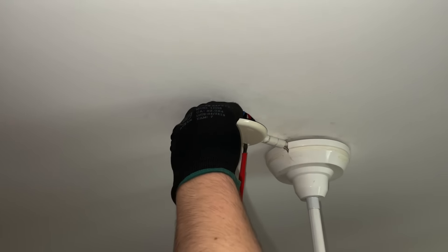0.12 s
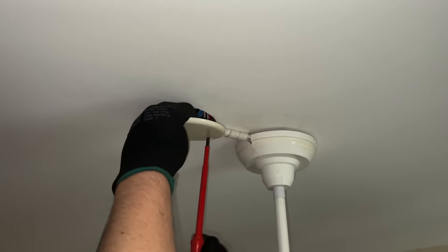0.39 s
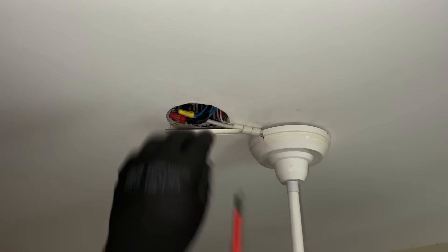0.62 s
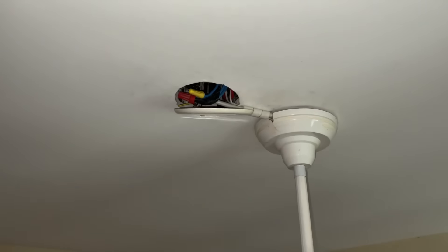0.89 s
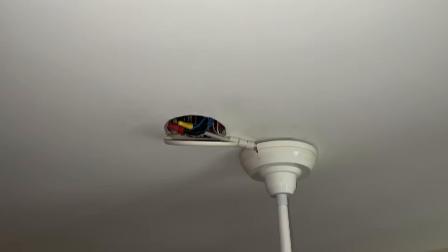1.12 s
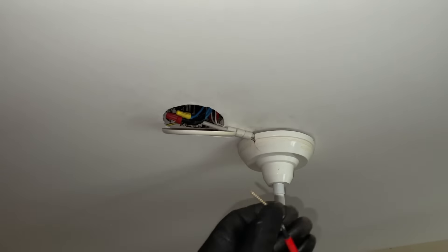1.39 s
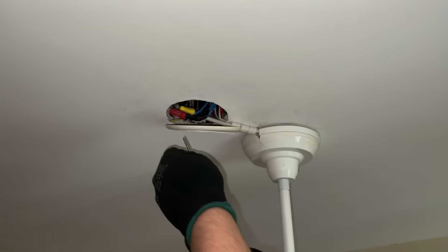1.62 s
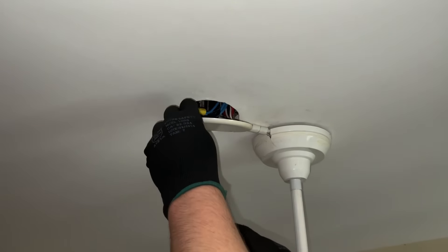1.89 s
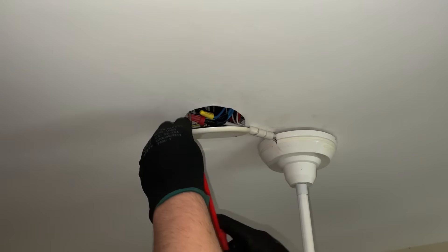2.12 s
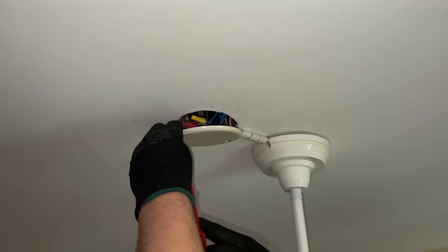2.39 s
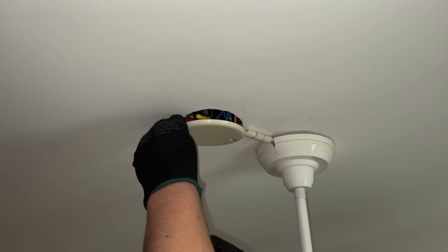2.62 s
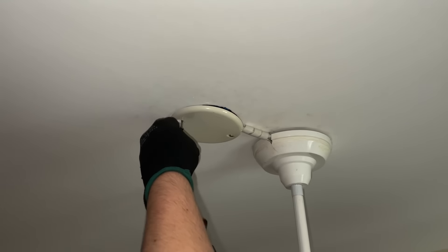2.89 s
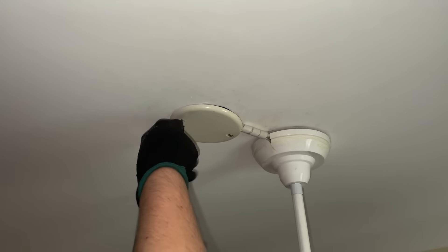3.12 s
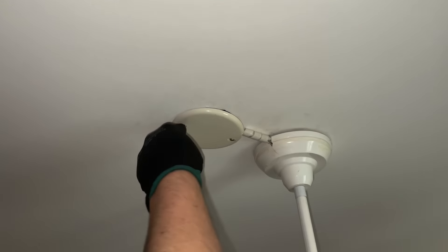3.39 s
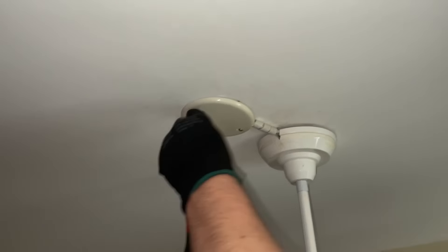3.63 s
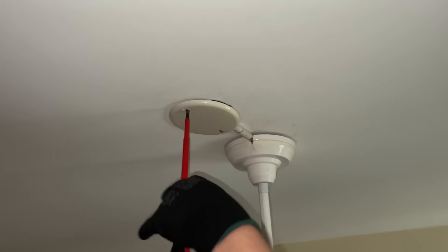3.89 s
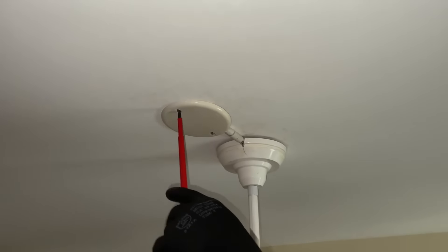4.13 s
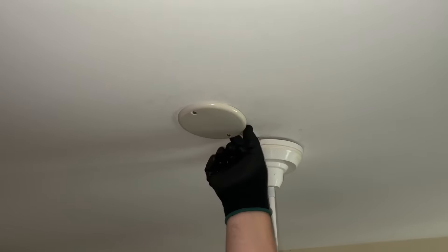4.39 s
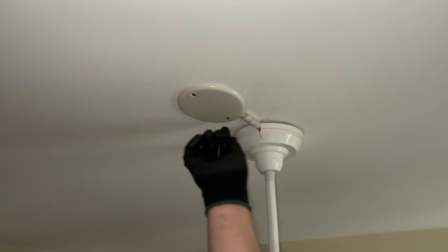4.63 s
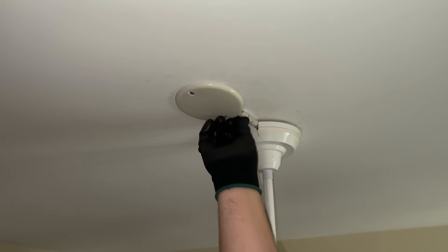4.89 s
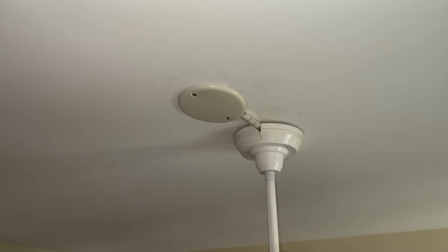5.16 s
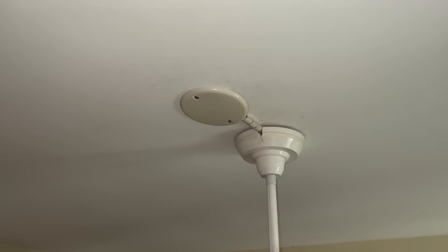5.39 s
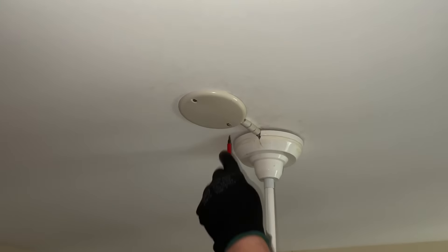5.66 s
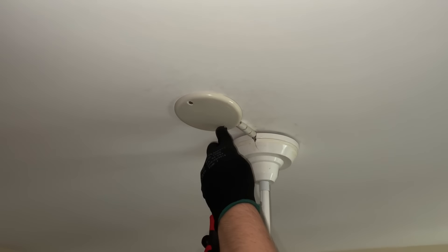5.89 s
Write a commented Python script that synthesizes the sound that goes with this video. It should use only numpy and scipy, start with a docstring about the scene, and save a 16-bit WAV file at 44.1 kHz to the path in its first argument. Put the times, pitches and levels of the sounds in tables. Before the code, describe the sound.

Sped-up fitting of a plastic ceiling cover: faint irregular knocks, rattles and glove scuffs, with one sharp loud clack near the middle.

```python
"""Fitting a cover to a ceiling box, in fast motion

Gloved hands and a screwdriver fit a plastic cover, heard from a phone below. Struck modes and noisy clatter
make its knocks and rattles, gritty coloured hisses the scuffs of glove and tool, low damped swings the thumps
of the phone's stand. The shaft of the screwdriver rings faintly. Between them, rumble, handling and rustle
flicker in short overlapping snatches with small ticks, over a steady faint hiss."""
import sys
import numpy as np
from scipy import signal
from scipy.fft import rfft, irfft
from scipy.io import wavfile
from scipy.ndimage import uniform_filter1d

SR = 44100
rng = np.random.default_rng(int(sys.argv[2]) if len(sys.argv) > 2 else 0)


def materialize(psi):
    """Save the field psi as 16-bit PCM at rate SR to the path in sys.argv[1].

    A 1-D psi becomes a single channel; in a 2-D psi each row is a channel.
    """
    bounded = np.clip(np.atleast_2d(psi).T, -1, 1)
    quanta = np.round(bounded * 32767).astype(np.int16)
    wavfile.write(sys.argv[1], SR, quanta)


def ratio(d):
    """dB to gain"""
    e = np.asarray(d, float) / 20
    return 10 ** e


N = 265614
T = np.arange(N) / SR

# Colour of loose clatter. Each row: frequency in Hz, relative level in dB.
CLATTER_COLOUR = [(300, 5), (1000, 0), (2500, -3.5), (4000, -12), (7000, -19), (12000, -31), (16000, -37)]
# Where the hands work. Each row: time in seconds, left minus right in dB.
HAND_PAN = [(0, -0.5), (1.5, 1), (2.2, 0.5), (2.8, -0.5), (3.4, 1.5), (3.87, 0), (3.94, 2), (4.6, -1),
            (5.3, -1), (6.02, 1)]


def on_hz(points, size):
    """Spreads a (Hz, value) table over the bins of a transform, along a log frequency axis."""
    hz, value = np.transpose(points)
    bins_hz = np.arange(size // 2 + 1) * SR / size
    return np.interp(np.log(bins_hz + 1), np.log(hz + 1), value)


def noise(colour, size=N, peaks_db=0):
    """Coloured stereo noise of rms 1, its sides differing by frequency; peaks_db adds chance resonances."""
    # Stereo difference. Each row: frequency in Hz, side signal as a share of mid.
    side_share = [(30, .08), (100, .12), (300, .3), (1000, .5), (2000, .6), (6000, .6), (7700, .06),
                  (8900, .06), (10000, .15), (16000, .1)]
    mid, side = rfft(rng.standard_normal((2, size)))
    octaves = np.arange(5.5, 15, .2)
    peaks = on_hz(np.c_[2 ** octaves, rng.standard_normal(len(octaves))], size)
    tone = ratio(on_hz(colour, size) + peaks_db * peaks)
    difference = on_hz(side_share, size) * side * np.array([[1], [-1]])
    x = irfft(tone * (mid + difference), size)
    return x / x.std()


def ring(x, hz, t60):
    """Excites a damped mode, one complex pole; a unit click gives a peak near 1."""
    pole = np.exp(2j * np.pi * hz / SR - np.log(1000) / (t60 * SR))
    return signal.lfilter([1], [1, -pole], x).imag


def grit(size, spread_db, grain=40):
    """Uneven contact: a gain of many small grains and a few large, each grain samples long."""
    levels = np.repeat(rng.exponential(1, size // grain + 1), grain)
    return ratio(spread_db * uniform_filter1d(levels, grain)[:size])


def add(out, s, sound, pan_db):
    """Places a sound at s seconds, pan_db louder on the left than on the right."""
    i = int(s * SR)
    panned = sound * ratio(np.array([[pan_db], [-pan_db]]) / 2)
    out[:, i:i + sound.shape[-1]] += panned[:, :N - i]


def hand_pan(s):
    """Left minus right in dB where the hands are at s seconds."""
    return np.interp(s, *np.transpose(HAND_PAN))


def knocks():
    """A blow rings the held cover, a rattle its upper modes; clatter and a short room tail follow."""
    # Blows on the cover. Each row: start in seconds, level of the ring's peak in dB, ring in Hz,
    # clatter against ring in dB, nominal 60 dB decay in seconds before choking.
    blows = [(.013, -41.5, 640, -6.5, 0.019), (0.095, -53, 490, 3, 0.094), (.162, -44, 510, 0, 0.028),
             (0.215, -57, 703, -1, 0.032), (0.238, -54, 493, 3, 0.071), (0.251, -47, 720, -5, 0.044),
             (0.266, -39.5, 388, -3.5, 0.025), (0.275, -43, 567, -13, 0.024), (0.2993, -36, 714, -5, 0.031),
             (0.32, -51, 626, -3, 0.042), (.408, -45.5, 573, -3.5, 0.053), (.514, -32.5, 316, 9.5, 0.042),
             (0.594, -39, 444, -8, 0.069), (0.723, -54, 290, -3, 0.14), (0.9149, -38.5, 384, -6, 0.11),
             (1.07, -64.5, 332, 7, 0.12), (1.698, -49, 353, 3, 0.034), (1.735, -56, 364, 1, 0.058),
             (1.751, -42.5, 633, -5, 0.047), (1.7612, -38, 610, -3, 0.044), (1.783, -38.5, 465, 0, 0.045),
             (1.7996, -31.5, 1240, 5, 0.024), (1.808, -45, 620, -13, 0.051),
             (1.826, -47, 1127, 14.5, 0.046), (1.901, -28.5, 1050, 9.5, 0.046),
             (1.906, -27, 418, 1.5, 0.048), (1.936, -31, 1144, 3.5, 0.056), (1.943, -43.5, 603, -1, 0.15),
             (2.008, -36, 1220, -0.5, 0.039), (2.16, -44.5, 428, -5, 0.084), (2.297, -24, 466, -4.5, 0.063),
             (2.307, -31, 467, -15.5, 0.091), (2.357, -53.5, 520, 0, 0.047), (2.379, -52, 377, -3.5, 0.065),
             (2.401, -56, 346, -7.5, 0.053), (2.434, -56, 455, 0.5, 0.063), (2.601, -54, 582, -5, 0.022),
             (2.639, -38.5, 310, -9.5, 0.027), (2.673, -54, 470, 6, 0.021), (2.738, -49, 520, -27, 0.055),
             (2.768, -34.5, 335, -13, 0.027), (2.803, -18, 440, -7, 0.037), (2.807, -12, 456, -10.5, 0.037),
             (2.809, -25, 1400, -22, 0.026), (2.816, -25.5, 440, -27, 0.021), (2.832, -23, 626, -1, 0.02),
             (2.853, -50.5, 459, -0.5, 0.083), (2.866, -46, 520, -9.5, 0.04), (2.88, -57, 493, -0.5, 0.16),
             (3.006, -42.5, 436, -37, 0.021), (3.108, -51.5, 449, -28.5, 0.16),
             (3.202, -44, 347, -3.5, 0.066), (3.35, -42, 563, -6, 0.038), (3.422, -52.5, 358, -7.5, 0.053),
             (3.663, -53, 298, 4.5, 0.041), (3.864, -40, 895, 8, 0.046), (3.866, -24.5, 512, -6.5, 0.042),
             (3.942, -30, 686, -11.5, 0.018), (3.951, -46.5, 602, 2.5, 0.11), (4.388, -60, 490, 3.5, 0.039),
             (4.453, -34, 890, -15.5, 0.065), (4.459, -32.5, 745, -17, 0.025), (4.487, -54, 680, -2, 0.054),
             (4.546, -54, 1220, 2, 0.029), (4.56, -48.5, 667, -3.5, 0.089), (4.589, -48.5, 674, 4, 0.073),
             (4.718, -57.5, 410, -1, 0.052), (4.885, -63.5, 458, -7, 0.078), (5.116, -54.5, 313, -1, 0.14),
             (5.23, -47.5, 502, -8, 0.13), (5.29, -39.5, 279, -9, 0.13), (5.731, -43.5, 432, -3.5, 0.078),
             (5.78, -50.5, 387, -2.5, 0.079), (5.84, -44, 820, 4.5, 0.054), (6.007, -26.5, 776, 1.5, 0.034),
             (6.008, -28, 394, -33, 0.034)]
    # Upper modes of the cover. Each row: frequency in Hz, relative level in dB, longest 60 dB decay in seconds.
    cover_modes = [(640, 6, 0.11), (997, 4, 0.02), (1424, 2, .06), (2040, -1, 0.049), (2460, 0, 0.042),
                   (2860, 1, .04), (3250, 8.5, 0.023), (5030, -4.5, 0.074)]
    split = 0.18  # neighbouring modes, as a share of the ring's pitch
    out, t = np.zeros((2, N)), T[:8192]
    lean = np.array([[.6], [-.6]])  # modes radiate unevenly to the two sides
    for s, db, hz, clatter_db, t60 in blows:
        # a blow that drags on touches longer
        contact_s = 0.00083 + 0.0058 * t60
        touch = t * np.exp(-t / contact_s)
        blow = touch * np.sin(2 * np.pi * hz * t)
        rattle = touch * rng.standard_normal(len(t))

        # the ring sags in pitch as the cover springs back, then the glove chokes it
        sagging_t = t / (1 + 0.48 * t)
        choke = ratio(-498.5 * (t / t60) ** 3)
        body = np.interp(sagging_t, t, ring(blow, hz, t60)) * choke
        # neighbouring modes beat with the main one and die away within about 45 ms
        above = ring(blow, hz * (1 + split), min(t60, .045))
        below = ring(blow, hz * (1 - split), min(t60, .045))
        body = body + ratio(-8) * (above * (1 + lean) + below * (1 - lean))

        upper = np.zeros((2, len(t)))
        for mode_hz, mode_db, mode_t60 in cover_modes:
            stronger, sharper = rng.standard_normal(2)
            mode = ring(rattle, mode_hz * (1 + 0.033 * sharper), min(mode_t60, t60))
            upper += ratio(mode_db + 3 * stronger) * mode * (1 + lean * np.sign(stronger))

        # the room's decay lasts 0.15 s, whatever the blow
        rise = 1 - np.exp(-t / contact_s)
        fade = rise * (ratio(-60 * t / t60) + ratio(-24 - 60 * t / 0.15))
        # a padded blow clatters less and duller
        colour = [(f, g + 0.45 * clatter_db * np.log2(f / 2000)) for f, g in CLATTER_COLOUR]
        clatter = grit(len(t), 1.2) * noise(colour, size=len(t), peaks_db=3)
        bright = ratio(-1.2) * upper / np.abs(upper).max() + fade * clatter / clatter.std()
        tail_colour = [(hz / 3, -18), (hz, 0), (hz * 3, -14)]
        tail = fade * noise(tail_colour, size=len(t), peaks_db=14)

        knock = body / np.abs(body).max() + ratio(clatter_db) * bright + ratio(-15) * tail
        add(out, s, ratio(db) * knock, hand_pan(s))
    # a small cover radiates no bass
    return signal.sosfilt(signal.butter(4, 260, "high", fs=SR, output="sos"), out)


def slide(out, s, db, colour, swell_s, fall_s, grit_db):
    """One gritty, coloured hiss that swells and dies as two surfaces rub."""
    t = T[:4096]
    rise = np.sin(np.pi / 2 * np.clip(t / swell_s, 0, 1)) ** 2
    fall = np.cos(np.pi / 2 * np.clip((t - swell_s) / max(fall_s, .001), 0, 1)) ** 2
    hiss = grit(len(t), grit_db) * noise(colour, size=len(t), peaks_db=3.5)
    add(out, s, ratio(db) * rise * fall * hiss / hiss.std(), hand_pan(s))


def scuffs():
    """Glove and tool slide on plastic: broad bands of hiss that swell longer in a longer slide."""
    # Slides. Each row: start in seconds, hiss rms before its envelope in dB, centre in Hz, length in seconds.
    slides = [(0.071, -54, 2970, 0.082), (0.158, -53.5, 3240, 0.064), (0.204, -58, 1610, 0.08),
              (0.259, -50, 1570, 0.025), (0.315, -54, 2000, 0.081), (0.393, -51, 3750, 0.059),
              (0.484, -51, 3200, 0.034), (0.539, -55, 2140, 0.044), (0.761, -61, 1830, 0.067),
              (0.931, -35.5, 4960, 0.03), (1.005, -60, 3960, 0.13), (1.105, -62, 800, 0.082),
              (1.18, -61, 800, 0.11), (1.212, -62, 2780, 0.067), (1.288, -50, 2510, 0.053),
              (1.332, -59.5, 2100, 0.05), (1.39, -53, 5200, 0.024), (1.412, -69.5, 3570, 0.048),
              (1.562, -46, 5200, 0.036), (1.582, -54, 4350, 0.055), (1.972, -49.5, 1760, 0.03),
              (2.119, -56.5, 2930, 0.056), (2.15, -44.5, 2330, 0.039), (2.207, -56.5, 1850, 0.059),
              (2.288, -40, 3220, 0.013), (2.696, -55, 3220, 0.055), (2.929, -54.5, 1500, 0.042),
              (2.99, -50, 1620, 0.038), (3.018, -50.5, 1580, 0.035), (3.099, -56, 5250, 0.059),
              (3.146, -54, 2470, 0.078), (3.191, -52.5, 2850, 0.048), (3.292, -56.5, 1840, 0.051),
              (3.941, -54.5, 2480, 0.061), (4.013, -58.5, 2860, 0.038), (4.192, -51.5, 1830, 0.036),
              (4.351, -55.5, 3900, 0.092), (4.449, -43, 3540, 0.019), (4.525, -55, 4900, 0.069),
              (4.702, -70, 2000, 0.037), (4.761, -73, 4760, 0.025), (4.982, -58.5, 3340, 0.046),
              (5.053, -67.5, 4750, 0.28), (5.127, -54, 1820, 0.034), (5.269, -40, 3650, 0.042),
              (5.299, -40, 3340, 0.031), (5.324, -50, 3350, 0.045), (5.506, -59, 1590, 0.02),
              (5.661, -49.5, 2150, 0.038), (5.687, -52.5, 4300, 0.051), (5.853, -61, 1880, 0.031),
              (5.917, -85, 1290, 0.016), (5.95, -48.5, 3330, 0.05)]
    out = np.zeros((2, N))
    for s, db, hz, length in slides:
        swell_s = 0.012 + 0.064 * length
        colour = [(hz / 8, -15), (hz / 1.5, 0), (hz * 1.5, 0), (hz * 8, -10)]
        slide(out, s, db, colour, swell_s, length - swell_s, grit_db=2)
    return out


def taps():
    """The steel tip touches screw or cover: a brief bright tick of narrower hiss."""
    # Touches. Each row: start in seconds, hiss rms before its envelope in dB, centre in Hz,
    # half the fall time in seconds.
    touches = [(1.5601, -36, 4570, 0.0054), (1.5748, -33, 4700, 0.00065), (3.092, -40.5, 3250, 0.005),
               (3.2544, -53.5, 2550, 0.0027), (4.5474, -44, 4660, 0.00053), (5.672, -36.5, 2680, 0.0056)]
    out = np.zeros((2, N))
    for s, db, hz, half_fall in touches:
        colour = [(hz / 4, -22), (hz / 1.25, -9), (hz, 0), (hz * 1.25, -6), (hz * 4, -10)]
        slide(out, s, db, colour, .003, 2 * half_fall, grit_db=-2)
    return out


def shaft():
    """The loosely held screwdriver rattles and rings faintly when it knocks the cover."""
    # Modes of the shaft. Each row: frequency in Hz, relative level in dB, 60 dB decay in seconds.
    shaft_modes = [(842, -5.5, 0.043), (1095, -21.5, 0.054), (1488, 4, 0.046), (2108, -5.5, 0.028),
                   (2664, -5.5, 0.03)]
    # Knocks of the shaft. Each row: start in seconds, level of the ring's peak in dB.
    hits = [(3.351, -48.5), (3.448, -50.5), (4.56, -42), (4.587, -41), (4.599, -43.5), (5.664, -47),
            (4.711, -51.5), (5.735, -49), (5.758, -44), (5.78, -53), (5.841, -42.5)]
    out, t = np.zeros((2, N)), T[:8192]
    for s, db in hits:
        rattle = np.exp(-t / 0.0049) * grit(len(t), 2.6) * rng.standard_normal(len(t))
        rung = np.zeros(len(t))
        for hz, mode_db, t60 in shaft_modes:
            stronger, sharper = rng.standard_normal(2)
            rung += ratio(mode_db + 2.7 * stronger) * ring(rattle, hz * (1 + 0.017 * sharper), t60)
        clatter = np.exp(-t / 0.026) * noise(CLATTER_COLOUR, size=len(t))
        add(out, s, ratio(db) * (rung / np.abs(rung).max() + ratio(-19) * clatter), 2.5)
    return out


def thumps():
    """A soft push sets the stand swinging: a short dip, a full swing, a return; its joints shake along."""
    # Bumps. Each row: start in seconds, nominal peak in dB, swing in Hz, 60 dB decay in seconds.
    bumps = [(0.152, -45.5, 133, 0.064), (0.514, -43, 115.4, 0.092), (0.925, -31.5, 93.2, 0.046),
             (0.953, -37.5, 55, 0.11), (5.2287, -27, 49, 0.11), (5.289, -32, 56, 0.08),
             (5.362, -49.5, 58, 0.074), (5.735, -48.5, 180, 0.042), (6.006, -41, 180, 0.15)]
    out, t = np.zeros((2, N)), T[:8192]
    for s, db, hz, t60 in bumps:
        fade = (1 - np.exp(-t / 0.002)) * ratio(-60 * t / t60)
        shake = noise([(hz, -8), (180, 0), (450, -14), (1500, -40), (5000, -70)], size=len(t))
        swing = -np.sin(2 * np.pi * hz * t + 1.7)
        add(out, s, ratio(db) * fade * (ratio(-13) * shake + swing) / fade.max(), 0)
    return out


def ticks(level):
    """Small unplanned touches of wire, screw and cover: short rings at random, following the given level."""
    out, t = np.zeros((2, N)), T[:1024]
    for when, pitch, size, pan in rng.random((800, 4)):
        hz = 350 * 2 ** (3.7 * pitch)
        burst = rng.standard_normal(len(t)) * np.exp(-t / .003)
        tick = ring(burst, hz, 24 / hz + .008)
        tick_db = 1.5 - 2.5 * np.log(1 - size)  # many small, a few loud
        add(out, when * T[-1], tick / np.abs(tick).max() * ratio(tick_db), 4 * pan - 1)
    return out * level


def snatches(rate, spread_db):
    """Fast motion: rate short pieces a second, each with its own level, cross-faded."""
    k = int(SR / rate)
    levels = np.repeat(rng.standard_normal(N // k + 1), k)
    return ratio(spread_db * uniform_filter1d(levels, k // 2)[:N])


def bed():
    """Room rumble, dull handling and cloth rustle flicker from snatch to snatch, over ticks and steady hiss."""
    # Levels between events, before the flicker. Each row: time in seconds, rumble in dB, handling in dB,
    # rustle in dB.
    levels = [(0, -71, -63, -64.5), (0.061, -75, -71, -71), (0.301, -64.5, -69, -57),
              (0.389, -69.5, -72, -85), (.45, -73.5, -63, -64.5), (.62, -70, -68.5, -79),
              (1.21, -71, -74.5, -75.5), (1.55, -73.5, -81.5, -82), (1.69, -71.5, -78.5, -89),
              (1.859, -71, -81.5, -96), (2.078, -90, -89.5, -80), (2.251, -75.5, -89, -74.5),
              (2.52, -82.5, -80.5, -79.5), (2.751, -70.5, -79, -72.5), (3.149, -83.5, -74, -63),
              (3.311, -103, -86.5, -76), (3.37, -70.5, -61.5, -68.5), (3.552, -75, -76.5, -75.5),
              (3.642, -67.5, -62, -65), (3.95, -65.5, -65, -83.5), (4.08, -95, -87.5, -71.5),
              (4.33, -95, -85, -74), (4.47, -63.5, -64.5, -72), (4.76, -79, -74, -82.5),
              (4.83, -93, -91.5, -84), (4.901, -74, -80, -78.5), (5.12, -69, -70, -75.5),
              (5.45, -69.5, -80, -67.5), (5.6, -74.5, -73.5, -72), (5.8, -76, -65.5, -82.5),
              (6.02, -84, -68.5, -59)]
    # Colours of the three layers. Each row: frequency in Hz, relative level in dB.
    rumble_colour = [(20, -12.5), (60, 5.5), (150, 7.5), (300, -22)]
    handling_colour = [(150, 12), (300, 10.5), (600, 9), (1000, -1), (2000, -15), (4000, -41)]
    rustle_colour = [(600, -30), (1500, 2.5), (3500, 4), (6000, 2), (10000, -2), (16000, -5)]
    s, *columns = np.transpose(levels)
    rumble, handling, rustle = (ratio(np.interp(T, s, column)) for column in columns)
    shared_flicker = snatches(30, 3.3)
    layers = rumble * snatches(30, 4) * noise(rumble_colour)
    layers += handling * snatches(35, 3.5) * noise(handling_colour)
    grain = grit(N, 2.8)
    layers += rustle * snatches(21, 0.53) * grain / grain.mean() * noise(rustle_colour)
    left_lean = ratio(np.array([[.6], [-.6]]))
    hiss = ratio(-92) * noise(rustle_colour)
    return shared_flicker * layers * left_lean + ticks(np.sqrt(handling * rustle)) + hiss


def scene():
    """Hands and tool at work, the stand's thumps and the bed, summed."""
    return knocks() + scuffs() + taps() + shaft() + thumps() + bed()


def band_limit(x):
    """A steep low-pass at the top of the band."""
    return signal.sosfilt(signal.butter(12, 16470, fs=SR, output="sos"), x)


def record(dry):
    """Two ports in one case: a phase lag between them that hollows the sum near 8 kHz, a cut at the top."""
    # Microphone response. Each row: frequency in Hz, gain in dB.
    mic_response = [(20, 5), (7000, -7.5), (8300, -6.5), (9500, -9), (15600, -8), (16400, -29)]
    # Phase between the ports. Each row: frequency in Hz, lead of the left port in radians.
    port_lead = [(50, .12), (300, .3), (1200, .25), (2000, -.3), (2800, 1.2), (4200, .5), (5500, .6),
                 (6300, -.3), (7900, -3), (9200, -4.2), (10800, -6.1), (13000, -7.2), (14700, -9.4),
                 (16500, -9.5)]
    # Level between the ports. Each row: frequency in Hz, left minus right in dB.
    port_tilt = [(100, -0.5), (400, -0.5), (5000, 2.5), (8000, 0)]
    side = np.array([[.5], [-.5]])
    ports = np.exp(1j * side * on_hz(port_lead, N)) * ratio(side * on_hz(port_tilt, N))
    x = irfft(rfft(dry) * ratio(on_hz(mic_response, N)) * ports, N)
    top_cut = signal.ellip(8, .2, 70, 16450, fs=SR, output="sos")
    return band_limit(signal.sosfilt(top_cut, x))


dry = scene()
out = record(dry)
materialize(out)
```